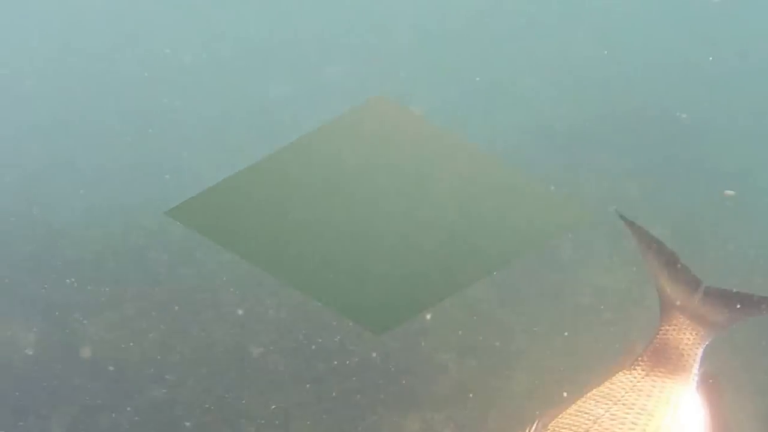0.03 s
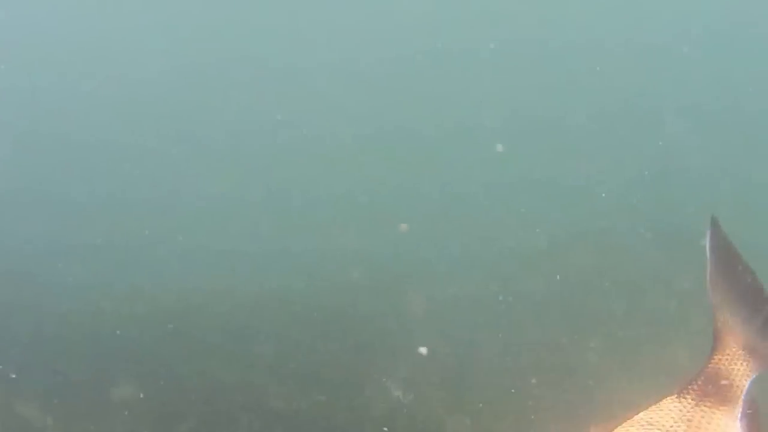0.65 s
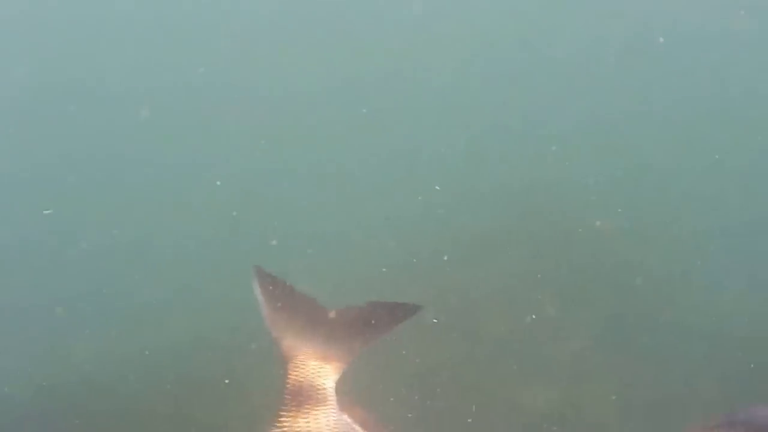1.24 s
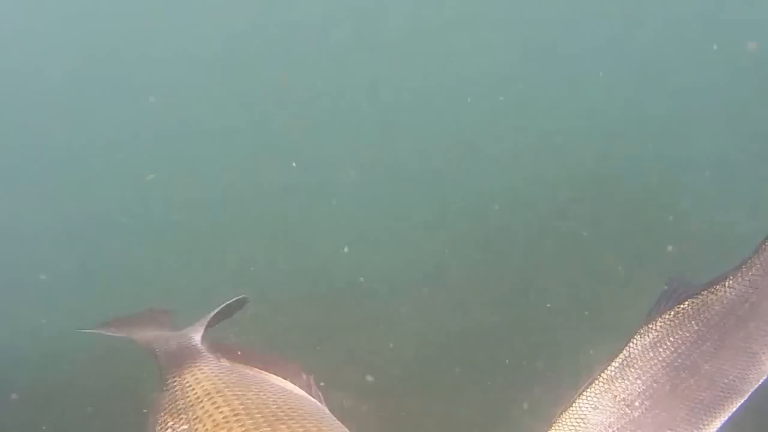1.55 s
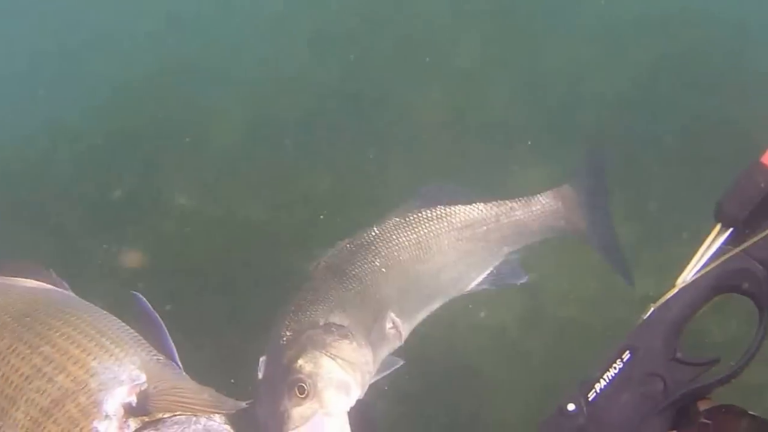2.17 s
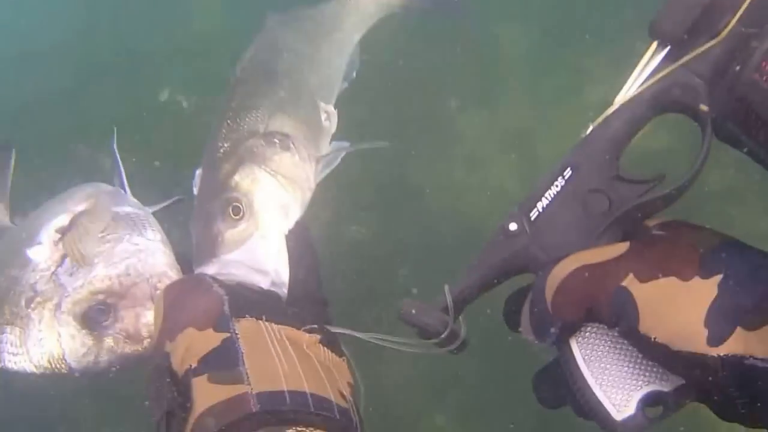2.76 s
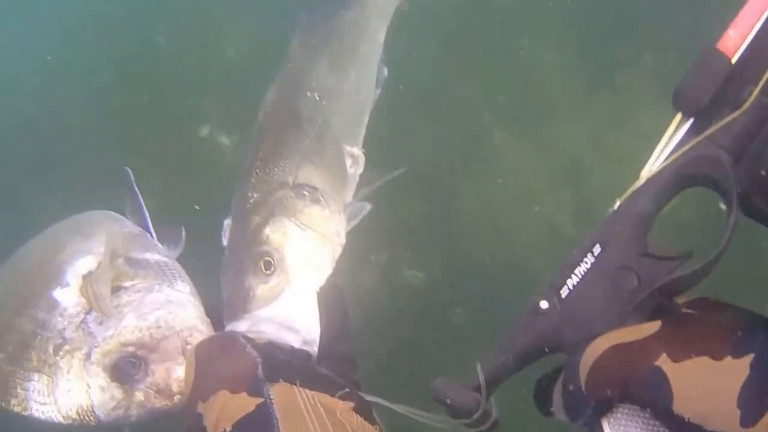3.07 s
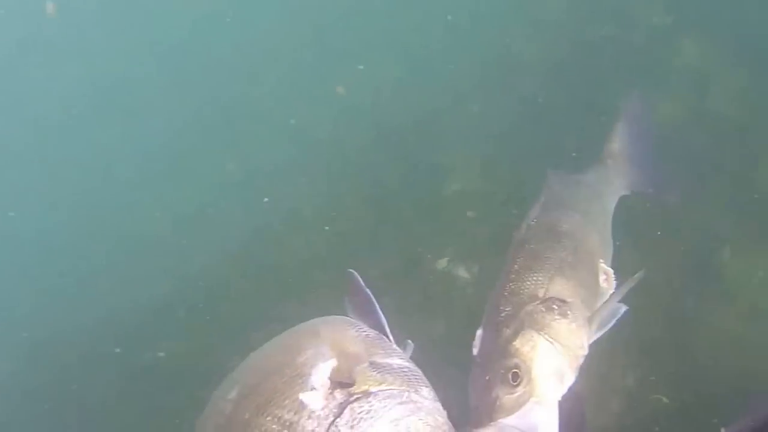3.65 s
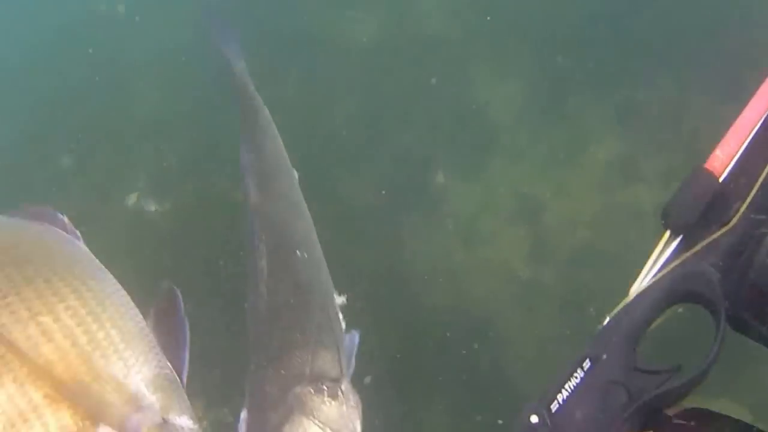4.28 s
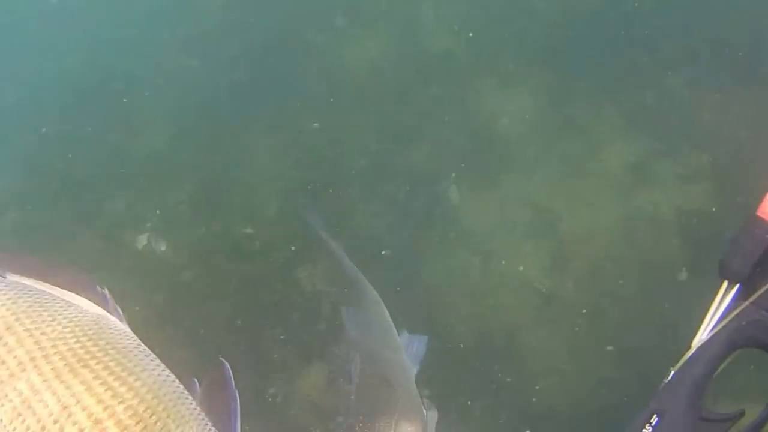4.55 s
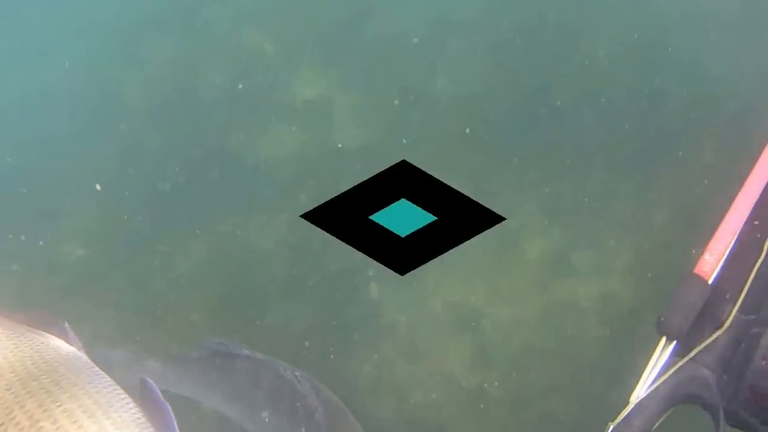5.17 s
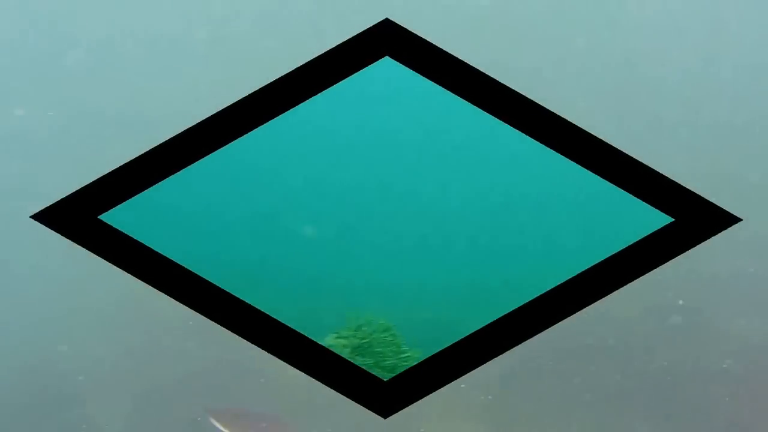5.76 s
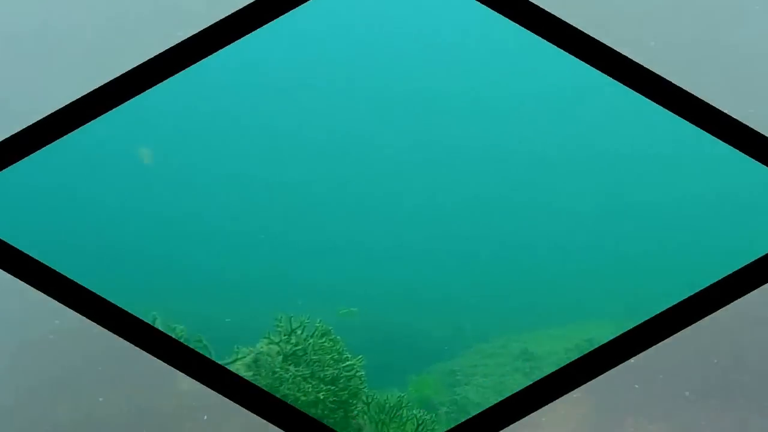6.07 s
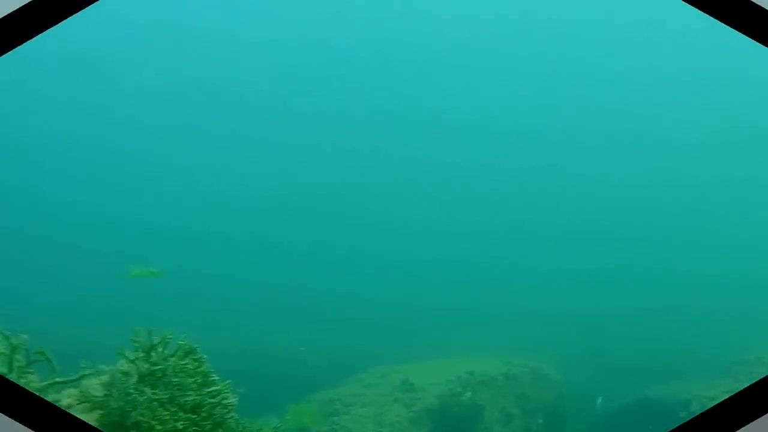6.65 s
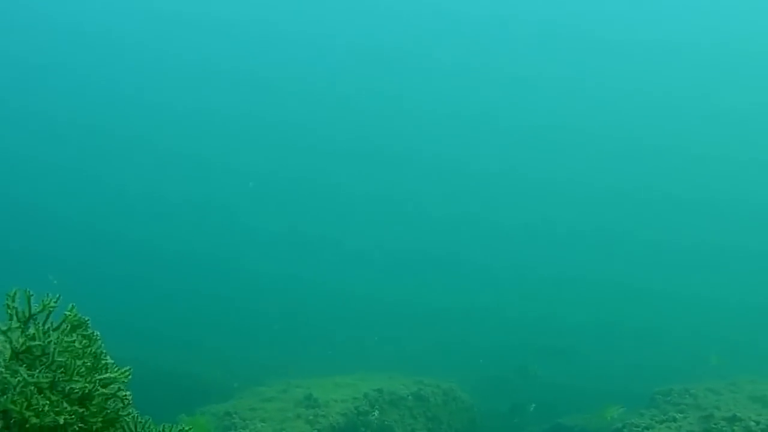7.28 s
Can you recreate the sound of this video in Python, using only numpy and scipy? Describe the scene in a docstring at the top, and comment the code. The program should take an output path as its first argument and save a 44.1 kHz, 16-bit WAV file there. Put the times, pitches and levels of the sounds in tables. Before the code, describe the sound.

A muffled underwater wash with faint far pops runs throughout, heard from inside a watertight microphone case. Close by, a diver's speargun knocks and ticks irregularly, its spear ringing very briefly, while speared fish are handled. Soft taps on the case lead to the loudest stretch, where clicks, crackles and small bubbles crowd together. After one low thump the handling thins out to occasional weak knocks.

```python
"""Under the sea, a diver handles a speargun and speared fish beside a microphone in a watertight case.
The gear knocks, taps the case and ticks against the spear, which rings briefly. Trapped air rings as
bubbles and rubbing crackles; moving bodies push rumble and dull thumps through the water.
Behind it lies the muffled wash of the sea with faint far pops."""
import sys
import numpy as np
from scipy import signal
from scipy.fft import rfft, irfft, next_fast_len
from scipy.io import wavfile
from scipy.ndimage import map_coordinates

SR = 44100
rng = np.random.default_rng(int(sys.argv[2]) if len(sys.argv) > 2 else 0)


def file_out(sig):
    """Save sig as 16-bit WAV at sys.argv[1]."""
    # one column per channel
    cols = np.atleast_2d(sig).T
    # limit, then scale
    lim = np.clip(cols, -1, 1)
    pcm = np.round(lim * 32767).astype(np.int16)
    wavfile.write(sys.argv[1], SR, pcm)


N = 327128
TIME = np.arange(N) / SR

# Diver's movements. Each row: start in seconds, hold in seconds, crackle level in dB, rumble level in dB.
MOVES = [(0.398, 0.19, -80, -49), (1.143, 0.036, -50, -54), (1.594, 0.022, -53, -44.5),
         (1.745, 0.18, -69, -61), (2.078, 0.06, -49, -55), (2.48, 0.05, -75, -47.5),
         (2.862, 0.64, -71, -51.5), (3.527, 0.19, -48, -47.5), (4.101, 0.15, -44.5, -46.5),
         (4.71, 0.25, -59, -49.5), (5.352, 0.033, -56.5, -41)]
# Metal contacts. Each row: start in seconds, crack peak in dB, crack upper edge in Hz,
# spear ring peak in dB, ring pitch in Hz.
TICKS = [(.525, -64, 4000, -53, 2930), (1.080, -40, 4400, -40.5, 2880), (1.090, -60, 4000, -48, 2900),
         (1.1505, -39, 4400, -47, 2930), (1.1837, -40.5, 5400, -45, 2890), (1.569, -50, 4000, -48, 2800),
         (2.0585, -34.5, 19200, -54, 2900), (2.0763, -29.5, 8500, -22.5, 3060),
         (2.084, -39, 10000, -50, 3560), (2.095, -40, 11000, -52, 4600), (3.278, -45, 4500, -57, 3840),
         (3.37, -45, 3480, -46, 2840), (3.4218, -43, 11100, -50, 4870), (3.466, -43, 4500, -44, 3280),
         (3.507, -38.5, 7900, -47, 3920), (3.540, -40, 11000, -49, 3700), (3.546, -45, 5000, -38, 3180),
         (3.552, -39, 8000, -53, 4870), (3.557, -50, 5000, -38.5, 3400), (3.596, -57, 4500, -40, 2920),
         (3.662, -45, 6000, -40, 3350), (3.699, -55, 4500, -38, 3350), (3.786, -41, 4700, -57, 2920),
         (4.031, -56, 4960, -43.5, 3180), (4.072, -45, 4500, -38, 2980), (4.086, -44, 5000, -44, 3600),
         (4.1103, -40, 7500, -47, 5970), (4.113, -43, 6000, -38, 3220), (4.122, -33.5, 11000, -45, 2950),
         (4.128, -37, 5000, -33, 2940), (4.1439, -38, 5970, -44, 4740), (4.214, -45, 6500, -43, 2850),
         (4.2483, -36, 5000, -24.5, 3030), (4.249, -46, 8000, -47.5, 7700), (4.733, -46, 3830, -40, 3130),
         (4.793, -55, 4000, -46, 2920), (5.283, -43, 4200, -44, 2720), (5.632, -62, 4000, -56, 2940),
         (6.488, -60, 4000, -55, 2790), (7.078, -48, 4400, -50, 3050)]
# Spectra of metal contact and of crackle. Each row: frequency in Hz, gain in dB.
TICK_COLOUR = [(500, -40), (1600, 6), (2300, -0.5), (2900, 9.5), (3700, 1.5), (4600, 2.5), (5300, -5),
               (6200, -0.5), (8200, -5.5), (10500, -6), (15000, -3)]
CRACKLE_COLOUR = [(200, 6.5), (500, -4), (800, -2.5), (1200, 1.5), (1700, -1.5), (2300, -16.5), (3100, -12),
                  (4200, -19), (6000, -28), (12000, -50)]


def undb(db):
    """Decibels to gain."""
    return 10 ** (np.asarray(db) / 20)


def peak(x, db):
    """Scale to a peak level."""
    return x * undb(db) / np.abs(x).max()


def level(x, db):
    """Scale to an rms level."""
    return x * undb(db) / x.std()


def add(out, start_s, x):
    """Mix a short sound in."""
    i = max(int(start_s * SR), 0)
    out[i:i + len(x)] += x[:max(N - i, 0)]


def colour(x, points):
    """Minimum-phase filter through (Hz, dB) points, built from the cepstrum."""
    size = next_fast_len(2 * len(x), True)
    hz, db = np.transpose(points)
    log_hz = np.log(np.maximum(np.fft.rfftfreq(size, 1 / SR), 1))
    gain = undb(np.interp(log_hz, np.log(hz), db))
    cepstrum = irfft(np.log(gain), size)
    cepstrum[1:size // 2] *= 2
    cepstrum[size // 2 + 1:] = 0
    return irfft(rfft(x, size) * np.exp(rfft(cepstrum, size)), size)[:len(x)]


def walk(rate_hz):
    """Random wander with a spread of 1."""
    knots_s = np.arange(0, TIME[-1] + 1, 1 / rate_hz)
    return level(np.interp(TIME, knots_s, rng.standard_normal(len(knots_s))), 0)


def fade(t, t60_s):
    """Exponential decay, 60 dB down at t60_s."""
    return np.exp(-np.log(1000) * t / t60_s)


def ring(hz, db, t60_s, glide, swell_s):
    """A tone swells and decays; its pitch slides by the share `glide`."""
    t = TIME[:int(max(t60_s, 0.002) * SR)]
    phase = 2 * np.pi * np.cumsum(hz * (1 + glide * t / t[-1])) / SR
    onset = 1 - np.exp(-(t / swell_s) ** 2)
    return peak(np.sin(phase) * fade(t, t60_s) * onset, db)


def effort(moves, rise_s, fall_s, rest_db):
    """Gain over time: each movement builds, holds and dies away above a resting level."""
    power = undb(rest_db) ** 2
    for start_s, hold_s, db in moves:
        away = np.maximum(start_s - TIME, 0) / rise_s + np.maximum(TIME - start_s - hold_s, 0) / fall_s
        power = power + (undb(db) * np.exp(-np.minimum(away, 20))) ** 2
    return np.sqrt(power)


def sea(wash_db=-52.5, waver_db=1.5, pop_count=70, lowest_pop_hz=750):
    """A dull wash whose low part wavers, with far pops: the smaller, the higher and weaker."""
    # Wash spectrum. Each row: frequency in Hz, gain in dB.
    sea_colour = [(15, 6), (40, -0.5), (90, -1.5), (190, -0.5), (330, -1.5), (520, -3.5), (760, -6.5),
                  (1100, -12), (1650, -15.5), (2300, -18.5), (3000, -21), (4800, -27), (8000, -31.5),
                  (15500, -36.5)]
    wash = level(colour(rng.standard_normal(N), sea_colour), wash_db)
    low = signal.sosfilt(signal.butter(1, 1200, fs=SR, output="sos"), wash)
    pops = np.zeros(N)
    for when, octave, loud in rng.random((pop_count, 3)) * [1, 2, 1]:
        db = -55 + 6 * loud - 3 * octave
        pop = ring(lowest_pop_hz * 2 ** octave, db, t60_s=0.006, glide=0, swell_s=0.0005)
        add(pops, when * TIME[-1], pop)
    return wash + low * (undb(waver_db * walk(20)) - 1) + pops


def flow(gust_db=3, gust_hz=21.97):
    """Eddies rumble on the case as the diver moves."""
    # Eddy spectrum. Each row: frequency in Hz, gain in dB.
    flow_colour = [(4, 9), (9, 7.5), (14, 10), (24, 1.5), (40, -8), (70, -6.5), (160, -9.5), (300, -10),
                   (700, -39), (3000, -80.5)]
    eddies = level(colour(rng.standard_normal(N), flow_colour), 0) * undb(gust_db * walk(gust_hz))
    pushes = [(start_s, hold_s, db) for start_s, hold_s, _, db in MOVES]
    return eddies * effort(pushes, rise_s=0.052, fall_s=0.11, rest_db=-69.5)


def crackle(count=6500, low_hz=450, high_hz=4500, max_glide=0.054, slips_per_s=700, grit_re_fizz_db=-19):
    """Rubbing frees tiny bubbles of many sizes, and the metal slips in a fine, uneven grit."""
    fizz = np.zeros(N)
    for when, size, weakness, sustain, slide in rng.random((count, 5)):
        hz = low_hz * (high_hz / low_hz) ** size
        db = -np.log(max(weakness, 0.03))
        t60_s = (3.5 + 20 * sustain ** 2) / hz
        add(fizz, when * TIME[-1], ring(hz, db, t60_s, max_glide * (2 * slide - 1), swell_s=0.002))
    fizz = level(colour(fizz, CRACKLE_COLOUR), 0)
    slips = (rng.random(N) < slips_per_s / SR) * rng.standard_normal(N)
    grit = signal.lfilter(*signal.butter(2, 4600, fs=SR), colour(slips, TICK_COLOUR))
    rubs = [(start_s, hold_s, db) for start_s, hold_s, db, _ in MOVES]
    return (fizz + level(grit, grit_re_fizz_db)) * effort(rubs, rise_s=0.033, fall_s=0.044, rest_db=-68)


def taps(edge_hz=1740, edge_hz_per_db=14, push_t60_s=0.0029, snap=10, hollow_hz=470, flex_hz=150):
    """The case smears a soft push into a hollow click and flexes with a thud; firmer taps reach higher."""
    # Taps on the case. Each row: start in seconds, click peak in dB.
    touches = [(0.279, -39), (0.78, -40), (1.470, -38), (1.6408, -28.5), (2.433, -38), (2.510, -31.5),
               (2.72, -38.5), (2.747, -38), (2.795, -33), (2.855, -32.5), (3.0117, -29.5), (3.085, -28),
               (3.239, -33.5), (4.561, -39.5), (6.709, -44)]
    out, t = np.zeros(N), TIME[:SR // 30]
    push = fade(t, push_t60_s) + snap * (t == 0)
    push = signal.lfilter(*signal.iirnotch(hollow_hz, 1, fs=SR), push)
    firmest_db = max(db for _, db in touches)
    for (start_s, db), spots in zip(touches, rng.random((len(touches), 3))):
        top_hz = edge_hz - edge_hz_per_db * (firmest_db - db)
        click = signal.sosfilt(signal.cheby1(8, 2, top_hz, fs=SR, output="sos"), push)
        for spot in spots:  # all-passes delay the upper part, differently for each tap
            _, poles = signal.iirpeak(top_hz * (1 + spot) / 2, 1, fs=SR)
            click = signal.lfilter(poles[::-1], poles, click)
        add(out, start_s, -peak(click, db))
        add(out, start_s, -ring(flex_hz, db - 8, t60_s=0.023, glide=0, swell_s=0.00023))
    return out


def ticks(t60_s=0.012):
    """Metal on metal: a crack that the water stops at once; sharper contacts reach higher."""
    out, t = np.zeros(N), TIME[:SR // 50]
    for start_s, db, edge_hz, _, _ in TICKS:
        crack = colour(rng.standard_normal(len(t)) * fade(t, t60_s), TICK_COLOUR)
        crack = signal.lfilter(*signal.butter(4, edge_hz, fs=SR), crack)
        add(out, start_s, peak(crack, db))
    return out


def spear(detune=0.012, swell_s=0.00098):
    """Each tick rings the spear briefly, at a pitch that depends on the spot."""
    # Spear modes. Each row: ratio to the ring pitch, relative level in dB, t60 in seconds.
    modes = [(.89, -2, 0.0098), (1, 5.5, 0.018), (1.109, -9.5, 0.017), (1.43, -18, 0.0077)]
    out, t = np.zeros(N), TIME[:SR // 30]
    onset = 1 - np.exp(-(t / swell_s) ** 2)
    for start_s, _, _, db, hz in TICKS:
        body = 0
        for ratio, mode_db, t60_s in modes:
            shift, phase_cycles = rng.standard_normal(2)
            wave = np.sin(2 * np.pi * (hz * ratio * (1 + detune * shift) * t + phase_cycles))
            body = body + undb(mode_db) * wave * fade(t, t60_s)
        add(out, start_s, peak(body * onset, db))
    return out


def thumps():
    """Dull low thumps, and small thuds just before taps on the case."""
    # Thumps and thuds. Each row: start in seconds, pitch in Hz, peak in dB, t60 in seconds.
    thuds = [(0.54, 95, -46, 0.66), (1.126, 390, -34, 0.043), (1.59, 112, -35.5, 0.087),
             (1.612, 195, -35, 0.14), (1.626, 94, -29.5, 0.13), (1.651, 201, -35, 0.16),
             (2.486, 150, -43, 0.022), (2.743, 148, -37.5, 0.014), (2.830, 150, -41, 0.015),
             (2.997, 139, -34, 0.016), (3.069, 138, -39, 0.028), (3.212, 150, -38, 0.015),
             (4.229, 95, -34, .03), (5.331, 128, -37, 0.044), (5.357, 88.5, -21, 0.057),
             (5.369, 174, -32, 0.11), (5.390, 191.3, -33, 0.2), (5.443, 149, -34, .05)]
    out = np.zeros(N)
    for start_s, hz, db, t60_s in thuds:
        add(out, start_s, ring(hz, db, t60_s, glide=0.022, swell_s=0.0015))
    return out


def bubbles(loud_db=-11.5, slower_per_db=0.055, wobble_db=1.5, min_wobble_hz=75, bend=0.015, choke=0.63):
    """Larger air pockets ring, wobble and choke as they break up; low, weak ones swell more slowly."""
    # Air pockets. Each row: start in seconds, pitch in Hz, peak in dB before wobble and choke,
    # t60 in seconds, pitch change over t60 as a share.
    pockets = [(1.1305, 742, -31, 0.12, 0.34), (1.1512, 823, -30, 0.046, 0.33),
               (1.153, 1327, -24, 0.08, -0.053), (1.184, 1250, -33, 0.024, -0.24),
               (1.304, 800, -34.5, 0.055, 0.1), (1.580, 670, -35.5, 0.074, -0.36),
               (1.742, 725, -44.5, 0.094, -0.065), (1.863, 735, -43.5, .05, 0.039),
               (2.0347, 1445, -27, 0.027, 0.93), (2.0776, 2750, -23.5, 0.015, -0.1),
               (2.0823, 1230, -29.5, 0.025, 0.13), (2.130, 1594, -37, 0.055, 0),
               (2.1517, 820, -21.5, 0.016, -0.53), (2.1533, 980, -27, 0.023, 0.44),
               (2.250, 1467, -39, 0.077, -0.72), (3.435, 736, -36.5, 0.03, 0.18),
               (3.509, 1700, -39, 0.091, -0.12), (3.5359, 1940, -27, 0.022, .2),
               (3.537, 1090, -26.5, 0.082, -0.018), (3.551, 990, -26, 0.038, -0.16),
               (3.5586, 707, -26, 0.048, -0.091), (3.576, 855, -25, 0.035, 0.25),
               (3.5904, 760, -28, 0.018, -0.2), (3.6088, 770, -26, 0.036, 0.15),
               (3.628, 740, -29, 0.028, -0.014), (3.6351, 866, -19.5, 0.038, -0.43),
               (3.6347, 1630, -14.5, 0.019, 0.19), (3.6353, 2020, -30, 0.032, -.35),
               (3.662, 4340, -40.5, 0.017, -0.036), (3.667, 1610, -41, 0.081, 0.15),
               (3.6948, 1820, -35, 0.018, -0.19), (3.700, 1670, -29, 0.024, -0.34),
               (3.721, 706, -26, 0.027, 0.14), (3.7127, 642, -15, 0.038, 0.27),
               (3.737, 680, -26.5, 0.015, 0.0082), (3.752, 1410, -39.5, 0.034, -0.0072),
               (3.8562, 810, -23.5, 0.02, 0.097), (3.8568, 1340, -27, 0.034, 0.05),
               (3.860, 962, -30, 0.038, 0.032), (4.044, 1620, -28.5, 0.031, 0.44),
               (4.094, 1955, -30.5, 0.055, 0.12), (4.0983, 1060, -15, 0.018, 0.53),
               (4.0994, 1654, -19, 0.034, 0.24), (4.1023, 860, -11.5, 0.053, -0.45),
               (4.1252, 521, -20.5, 0.027, 0.29), (4.1286, 1110, -27, 0.033, 0.1),
               (4.144, 794, -12.5, 0.031, -0.16), (4.1442, 4260, -31, 0.01, -0.14),
               (4.1495, 924, -26, .024, -0.022), (4.184, 1635, -20.5, 0.031, 0.17),
               (4.1989, 764, -29.5, 0.022, -0.56), (4.2147, 1360, -21.5, 0.014, -0.25),
               (4.2324, 373, -9.5, 0.024, -0.14), (4.242, 376.4, -22.5, 0.17, 0.13),
               (4.2487, 1250, -24.5, 0.018, -0.28), (4.249, 3980, -25, 0.016, 0.05),
               (4.2838, 845, -32, .06, -0.041), (4.3697, 426, -30.5, 0.057, 0.48),
               (4.370, 1690, -30.5, 0.029, -0.11), (4.371, 707, -26.5, 0.11, -0.39),
               (4.751, 818, -37, 0.1, 0.057), (4.784, 1750, -39, 0.015, 0.11),
               (4.793, 1580, -36, 0.016, -0.21), (4.829, 2330, -32, 0.042, -0.25),
               (4.832, 1713, -23, 0.057, -0.082), (4.867, 910, -41, 0.064, 0.11),
               (4.965, 737, -36.5, 0.053, 0.18), (5.026, 1200, -26, 0.069, -0.2)]
    out = np.zeros(N)
    for start_s, hz, db, t60_s, glide in pockets:
        swell_cycles = 0.46 * np.exp(slower_per_db * (loud_db - db))
        pocket = ring(hz, db, t60_s, glide, swell_cycles / hz)
        t = TIME[:len(pocket)]
        wobble_rad_per_s = 2 * np.pi * min_wobble_hz * (1 + rng.random())
        wobble = np.sin(wobble_rad_per_s * t) * (1 - fade(t, t60_s))
        warped_s = t + bend * wobble / wobble_rad_per_s  # bends the pitch
        pocket = map_coordinates(pocket, [warped_s * SR])
        intact = np.exp(-(t / (choke * t60_s)) ** 4)
        add(out, start_s, pocket * undb(wobble_db * wobble) * intact)
    return out


def knocks(scatter_db=2, detune=0.076, build_s=0.00085, chatter_re_body_db=-15, chatter_t60_s=0.048):
    """Each blow rings another spot of the gear and chatters; a soft contact leaves the high modes out."""
    # Blows. Each row: start in seconds, peak in dB, contact corner in Hz (higher is harder), t60 factor.
    blows = [(1.151, -24, 1900, 1.5), (1.2572, -35, 1140, 2.8), (1.593, -39, 700, 0.88),
             (1.6425, -26.5, 1570, 0.8), (1.998, -36, 1270, 0.88), (2.034, -33.5, 1000, 1.5),
             (2.059, -33, 1400, 0.8), (2.076, -29, 1600, 0.93), (2.086, -34, 1500, 1.4),
             (2.1511, -24, 880, 0.71), (2.161, -28.5, 1410, 0.77), (2.198, -30, 1640, 1.5),
             (3.421, -29, 1580, 1), (3.455, -35, 2600, 1.6), (3.484, -39, 1800, 1.6),
             (3.539, -22.5, 1510, 1.4), (3.5439, -23, 1000, 0.33), (3.553, -24, 2200, 1.4),
             (3.597, -28, 1500, 0.79), (3.635, -25, 1500, 0.96), (3.786, -41, 2200, 1.6),
             (3.856, -24, 2100, 0.72), (4.032, -24, 1420, 0.99), (4.036, -26, 1110, 1.9),
             (4.0732, -28, 2800, .8), (4.101, -22, 1700, 1.2), (4.114, -28, 3500, 0.62),
             (4.125, -27, 1500, 1.2), (4.1437, -22, 1090, 0.64), (4.2155, -23.5, 2600, 1.5),
             (4.2324, -25, 900, 0.62), (4.2486, -23, 3000, 0.7), (4.2588, -20, 2600, 0.49),
             (4.3692, -29, 1210, 0.67), (4.601, -37, 785, 0.33), (4.661, -36, 800, 0.68),
             (4.708, -37.5, 2540, 1.4), (4.8291, -18.5, 1510, 0.55), (5.018, -36.5, 2500, 1.2),
             (5.0257, -29.5, 895, 0.31), (6.133, -41.5, 750, 1), (6.489, -40.5, 750, .8),
             (6.7092, -43, 1100, 1.2), (6.945, -43, 1290, 1.2)]
    # Water-damped gear modes. Each row: frequency in Hz, relative level in dB, base t60 in seconds.
    modes = [(308, 8, 0.0018), (540, -19, 0.002), (740, -6.5, 0.027), (1090, -0.5, 0.0057),
             (1320, -9.5, 0.027), (1700, -2.5, 0.011), (2200, -15, 0.026), (3040, -5, 0.0072),
             (6200, -37, .005)]
    out, t = np.zeros(N), TIME[:SR // 20]
    onset = 1 - np.exp(-t / build_s)
    spots = rng.standard_normal((len(blows), len(modes), 3))
    for (start_s, db, corner_hz, t60_factor), spot in zip(blows, spots):
        body = 0
        for (hz, mode_db, t60_s), (weight, shift, path_cycles) in zip(modes, spot):
            # each mode reaches the case by its own path, so they do not peak together
            wave = np.sin(2 * np.pi * (hz * (1 + detune * shift) * t + path_cycles))
            body = body + undb(mode_db + scatter_db * weight) * wave * fade(t, t60_s * t60_factor)
        chatter = colour(rng.standard_normal(len(t)) * fade(t, chatter_t60_s), CRACKLE_COLOUR)
        blow = peak(body * onset, 0) + peak(chatter, chatter_re_body_db)
        blow = signal.lfilter(*signal.butter(2, corner_hz, fs=SR), blow)
        add(out, start_s, peak(blow, db))
    return out


def scene():
    """Everything reaches one microphone inside the case."""
    return (knocks() + taps() + ticks() + crackle() + flow() + sea() + spear() + bubbles() + thumps())[None]


def record(dry):
    """The sound drops out briefly near the end, and the top treble is cut."""
    gap_start_s, gap_end_s, top_hz = 7.1265, 7.176, 15800
    gain = np.where((TIME > gap_start_s) & (TIME < gap_end_s), 0.005, 1)
    return signal.sosfilt(signal.ellip(10, 0.2, 70, top_hz, fs=SR, output="sos"), dry * gain)


dry = scene()
out = record(dry)
file_out(out)
```